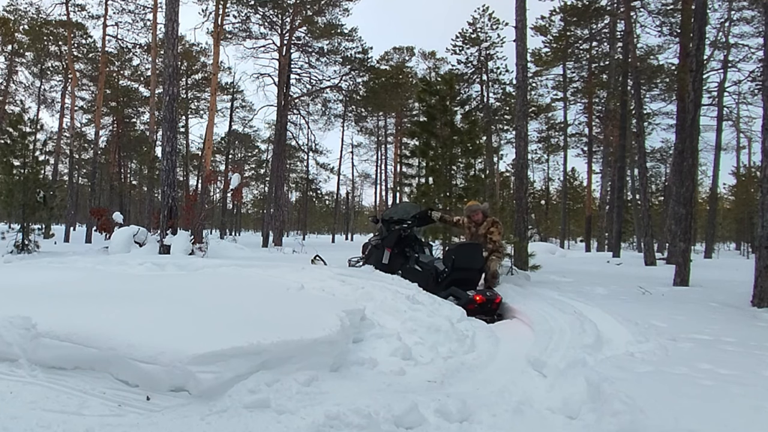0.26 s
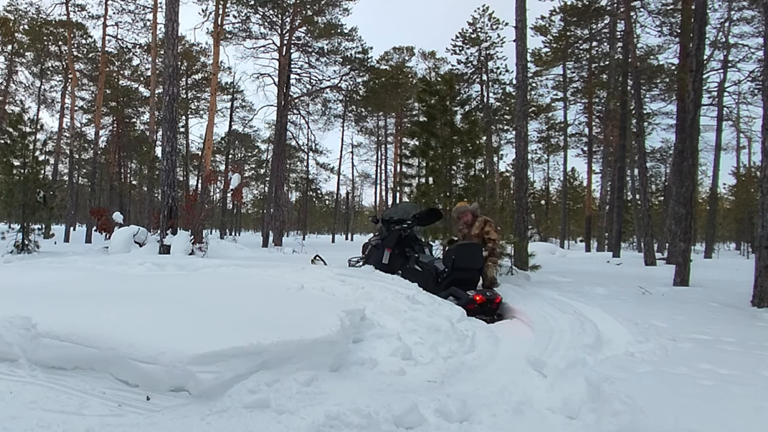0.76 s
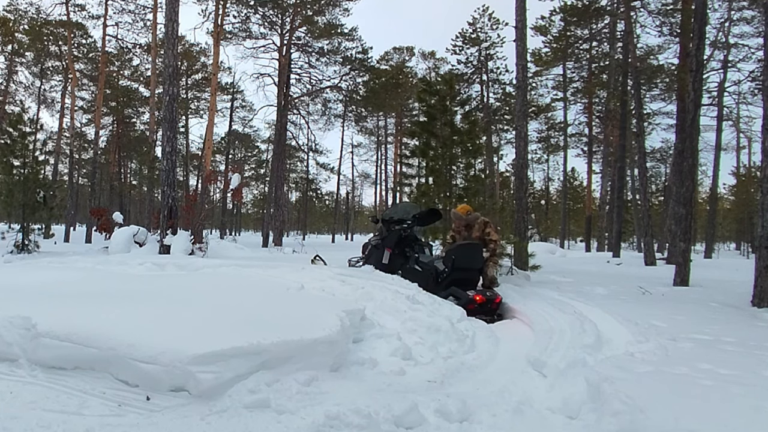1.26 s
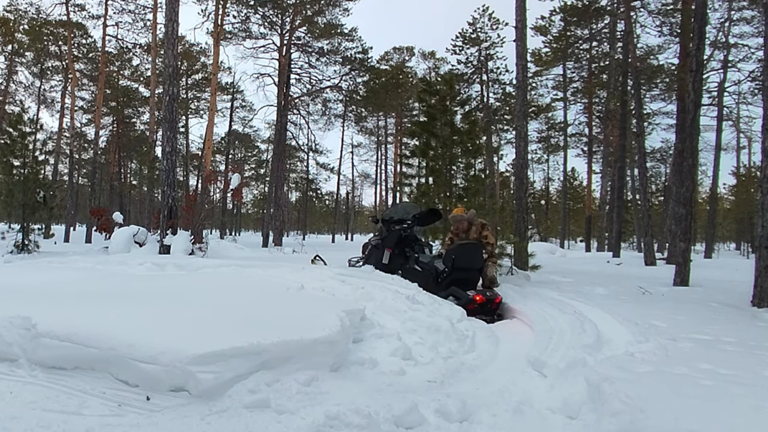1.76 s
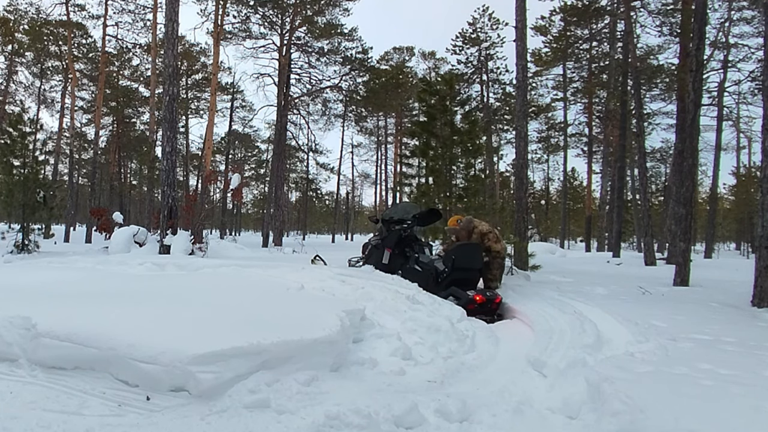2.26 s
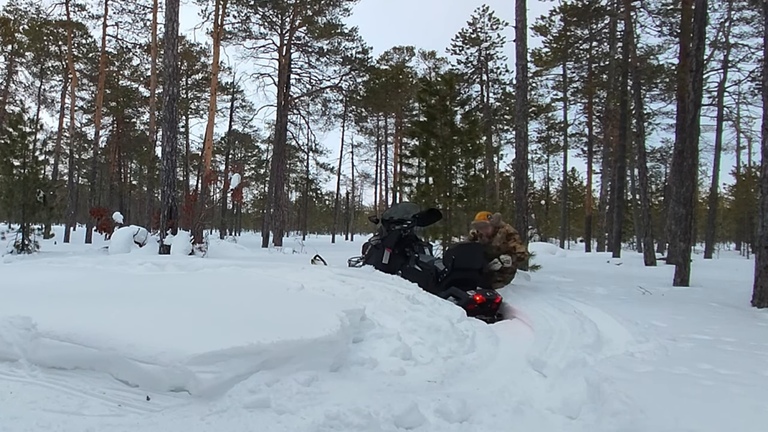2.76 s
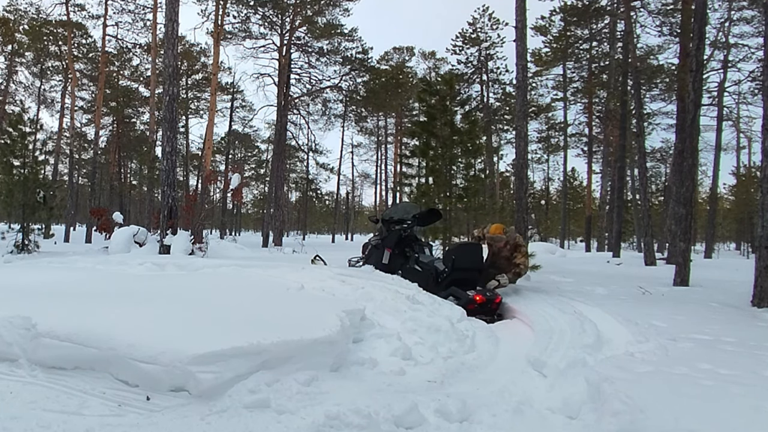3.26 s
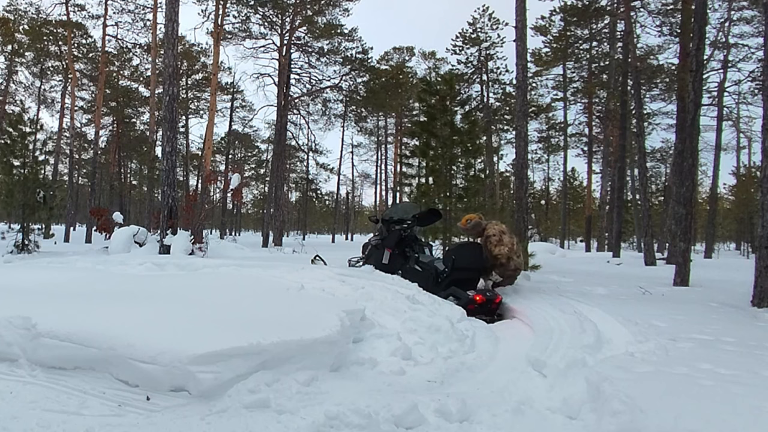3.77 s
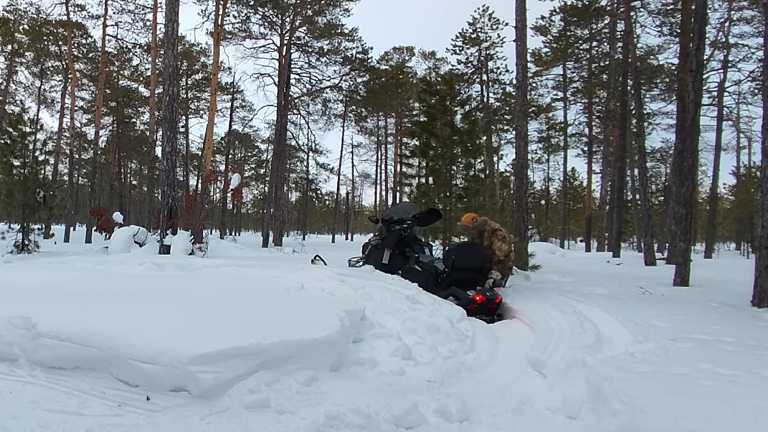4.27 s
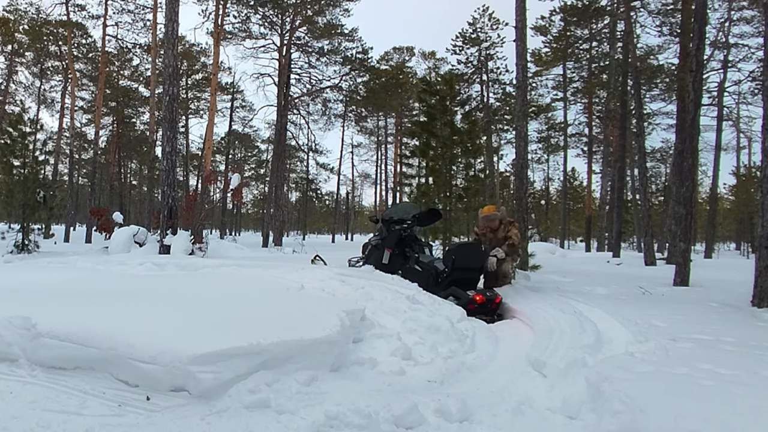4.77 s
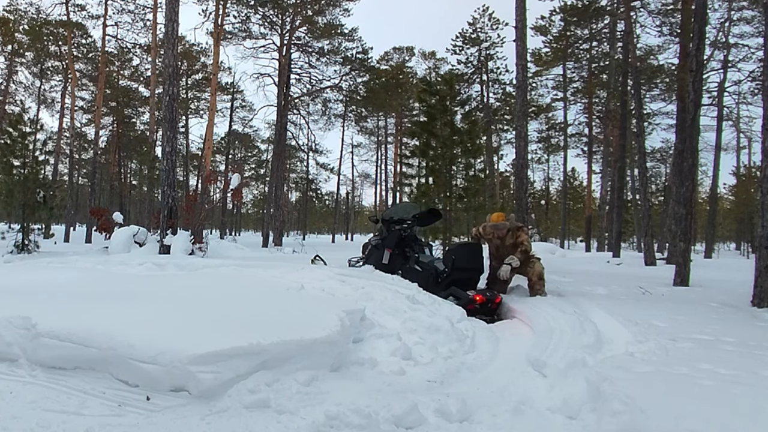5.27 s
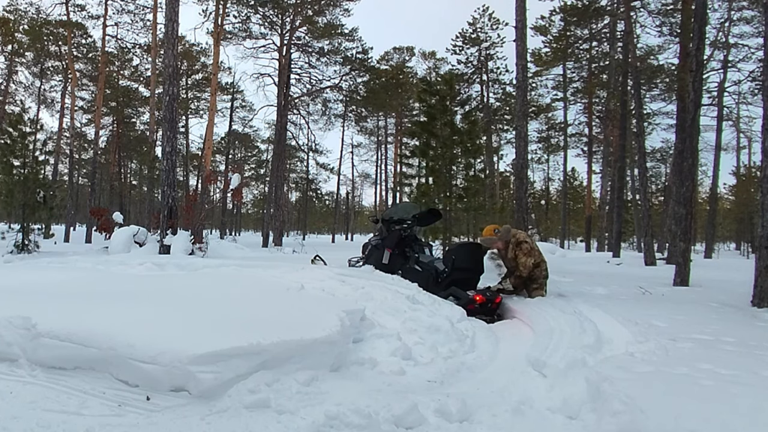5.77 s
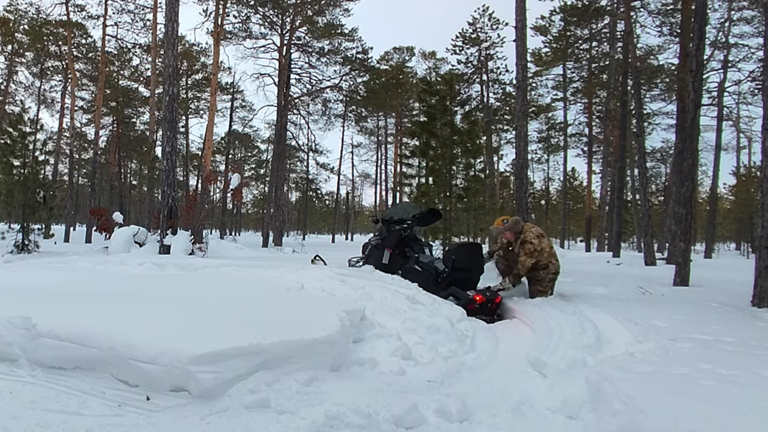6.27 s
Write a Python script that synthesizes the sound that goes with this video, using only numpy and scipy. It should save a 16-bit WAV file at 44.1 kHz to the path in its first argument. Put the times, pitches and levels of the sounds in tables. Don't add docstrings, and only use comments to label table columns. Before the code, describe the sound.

For about six and a half seconds a snowmobile idles some way off among snowy pines, never revving or stopping. Its exhaust beats low and fast, roughly twenty-seven thumps a second, each slightly different in strength and timing. A beat fails near 0.2 seconds, then around 1.9, 2.3, 3.0 and 3.2, with a soft late puff and a firmer catch afterward. Low rumble, plastic and metal clatter and steady airy fan and belt rush surround the thumps. Faint crisp clothing and snow rustles appear at 0.2-0.4, around 2 and 3, then more often from 4.6, strongest at 6.4. Dull gear knocks fall near 1.0 and 4.2, a tiny metallic jingle at 5.2 and a brighter knock at 5.6. The outdoor sound is fairly dry, with a brief muffled tree echo, narrow stereo leaning right and faint microphone hiss.

```python
import sys
import numpy as np
from scipy import signal
from scipy.fft import rfft, irfft, next_fast_len
from scipy.io import wavfile
from scipy.ndimage import uniform_filter1d

SR = 44100
rng = np.random.default_rng(int(sys.argv[2]) if len(sys.argv) > 2 else 0)


def output_pcm(signal):
    pcm = np.clip(np.atleast_2d(signal).T, -1, 1) * 32767
    wavfile.write(sys.argv[1], SR, np.round(pcm).astype(np.int16))


def rack_gain(trim_db):
    fader = np.asarray(trim_db, float)
    return 10 ** (fader / 20)


N = 287091

# time [s], level of the charge puffing late into the chamber [dB],
# time [s] and level [dB] of the firing that catches again, level left in the pipe at the misfire [dB].
MISFIRES = [
    (0.1788, -13, .2188, .7, -9),
    (1.858, -7, 1.8946, 2.6, -9),
    (2.306, -17, 2.3426, 2.5, -9),
    (2.9697, -11.5, 3.0101, .5, -9),
    (3.192, -3, 3.2317, 0, -12),
]


def at_hz(points, hz):
    point_hz, point_db = np.array(points).T
    return np.interp(np.log(hz + 1), np.log(point_hz), point_db, -90, -90)


def rms_one(x):
    return x / np.sqrt(np.mean(x ** 2) + 1e-20)


def coloured(x, spectrum):
    size = next_fast_len(N)
    gain = rack_gain(at_hz(spectrum, np.fft.rfftfreq(size, 1 / SR)))
    return rms_one(irfft(rfft(x, size) * gain, size)[..., :N])


def noise():
    return rng.standard_normal((2, N))


def drift(rate_hz):
    return coloured(rng.standard_normal(N), [(1, 0), (rate_hz, 0), (8 * rate_hz, -36)])


def clicks(times, sizes):
    out = np.full(N + SR // 5, 1e-18)
    places = np.round(np.asarray(times) * SR).astype(int) + SR // 10
    np.add.at(out, places, sizes)
    return out


def cut(x):
    return x[SR // 10:SR // 10 + N]


def ring(x, hz, t60):
    r, w = rack_gain(-60 / (t60 * SR)), 2 * np.pi * hz / SR
    return signal.lfilter([0, np.sin(w)], [1, -2 * r * np.cos(w), r * r], x)


def swelling(x, r):
    return signal.lfilter([1], [1, -2 * r, r * r], x)


def rumble():
    # frequency in Hz, level in dB per Hz.
    low_spectrum = [(15, -17), (25, -2), (45, -2.5), (100, -6.5), (180, 3), (215, -16.5), (300, -8),
                    (400, -27.5)]
    return rack_gain(-51.5) * coloured(noise(), low_spectrum)


def rustle(fidget_db, grains_per_s, spread_db):
    # time in seconds, peak level in dB, fading time in seconds.
    moves = [(0.18, -78, 0.12), (0.37, -76.5, 0.19), (1.75, -79.5, 0.055), (2.0, -77.5, 0.057),
             (2.24, -80.5, .05), (2.89, -82.5, 0.076), (3.049, -83, 0.029), (3.36, -78.5, 0.022),
             (3.84, -81, 0.11), (4.62, -74, 0.047), (5.05, -76.5, 0.1), (5.23, -75.5, 0.086),
             (5.55, -77, 0.042), (5.63, -75.5, .25), (6.26, -76.5, .08), (6.4, -68.5, 0.033),
             (6.5, -71, .05)]
    # frequency in Hz, level in dB per Hz.
    cloth = [(1500, -27.5), (3000, 7), (6000, -5), (9000, -5.5), (12000, -12), (15000, 0), (16500, -4.5)]
    t = np.arange(N) / SR
    level = rack_gain(-81.5 + fidget_db * drift(6.5))
    for s, db, fade in moves:
        slope_s = np.where(t < s, .6 * fade, fade)
        level = np.hypot(level, rack_gain(db) * np.exp(-abs(t - s) / slope_s))
    grains = rng.random((2, N)) < grains_per_s / SR
    grains = grains * rack_gain(spread_db * np.minimum(rng.exponential(1, (2, N)), 3))
    return level * coloured(grains * rng.choice([-1, 1], (2, N)), cloth)


def touches(blows, t60, gain_db):
    return sum(cut(ring(clicks([s], rack_gain(db + gain_db)), hz, t60)) for s, db, hz in blows)


def gear():
    # time in seconds, peak level in dB, pitch in Hz.
    knocks = [
        (0.981, -43, 520),
        (4.202, -45, 523),
        (5.627, -43, 1190),
    ]
    # time in seconds, peak level in dB, pitch in Hz.
    jingles = [
        (5.227, -58, 10300),
        (5.230, -62, 8000),
        (5.2669, -52, 10260),
        (5.268, -65, 7900),
    ]
    return touches(knocks, t60=0.03, gain_db=-1.5) + touches(jingles, t60=0.04, gain_db=-2.0)


def fan_rush(swell):
    # frequency in Hz, level in dB per Hz.
    air_spectrum = [(210, -29.5), (350, -11), (423, -9), (1010, -7), (1110, -15), (1340, -9), (1460, -14.5),
                    (1720, -11), (3250, -14.5), (4500, -21.5), (5160, -18.5), (9000, -33.5), (11700, -68.5),
                    (19800, -120)]
    return rack_gain(-62 + 0.2 * drift(13)) * (1 + 0.42 * swell) * coloured(noise(), air_spectrum)


def bustle(times, strength_db):
    # time after the firing in seconds, level in dB, length in seconds.
    bursts = [
        (-.011, 0.5, .006),
        (0.013, -0.27, .004),
    ]
    out = 0
    for offset, level_db, length in bursts:
        r = np.exp(-1 / (length * SR))
        blows = clicks(times + offset, rack_gain(level_db + 0.25 * strength_db))
        out = out + cut((1 - r) * np.e * swelling(blows, r))
    return out


def clatter(density, taps_per_s, spread_db):
    # panel pitch in Hz, level in dB, ringing time t60 in seconds.
    panels = [(378, -13, 0.082), (510, -7, 0.035), (660, -9, 0.023), (835, -5.5, 0.031),
              (998.6, -10.5, 0.34), (1036, -9, 0.062), (1188, -10, 0.029), (1338, -7.5, 0.028),
              (1596, -6, 0.027), (1727, -4.5, 0.017), (3924, -11, 0.009), (5030, -15.5, 0.004),
              (7310, -24, 0.015)]
    taps = rng.random((2, N)) < taps_per_s * density / SR
    taps = taps * rack_gain(spread_db * np.minimum(rng.exponential(1, (2, N)), 4))
    taps = taps * rng.choice([-1, 1], (2, N))
    dealt = rng.integers(0, 3, (2, N))
    out = 0
    for k, (hz, db, t60) in enumerate(panels):
        reaching = taps * (dealt == k % 3) + 1e-18
        out = out + rack_gain(db) * rms_one(ring(reaching, hz, t60))
    return rms_one(out)


def firings(slow_db_per_ms, scatter_db):
    # time in seconds, firings so far.
    crank = [(-0.047, 0), (0.0313, 2), (0.0711, 3), (0.9361, 26), (1.6042, 44), (2.1187, 58), (2.198, 60),
             (2.2346, 61), (2.6761, 73), (2.8208, 77), (3.0503, 83), (4.0463, 110), (4.1224, 112),
             (4.3687, 119), (5.0882, 139), (5.6751, 155), (6.0007, 164), (6.4915, 178)]
    # time in seconds, level in dB.
    at_start = (-.0087, 2.5)
    # time in seconds, level in dB against an ordinary firing.
    uneven = [(0.5228, -2.4), (0.596, -2.8), (0.7481, -2.7), (1.0126, 1.7), (1.1598, -2.2), (1.2374, 2.3),
              (1.3098, -1.2), (1.5296, -4.2), (1.5682, 2.5), (1.8207, 2.2), (2.1586, 2.9), (2.4167, -2.7),
              (2.4549, 2.2), (2.5624, -1.3), (2.783, -2.9), (3.3772, -4.3), (3.4547, 2.3), (3.7165, 1.8),
              (3.7923, 2.0), (3.8665, -1.7), (4.0839, -1.8), (4.1585, -1.2), (4.2619, 1.6), (4.942, -2.9),
              (5.1248, -1.7), (5.1617, -2.5), (5.2701, -1.9), (5.378, -1.9), (5.6367, -2.4), (6.3518, -3.6)]
    make_up = (-0.095, -.22, 0, -0.16)
    s, count = np.transpose(crank)
    turn = np.arange(count[-1] + 1)
    missed = [(row[0], row[4]) for row in MISFIRES]
    caught = [row[2:4] for row in MISFIRES]
    when, level_db = np.transpose([at_start] + uneven + missed + caught)
    which = np.round(np.interp(when, s, count)).astype(int)
    excess_db = np.bincount(which, np.maximum(level_db, -5), len(turn))

    turn_change = np.convolve(excess_db, [.22, .22, -.55, -.55])[1:len(turn) + 1]
    surge = np.cumsum(turn_change) / 1000
    known, first = np.unique(np.r_[which, count.astype(int)], return_index=True)
    times = surge + np.interp(turn, known, np.r_[when, s][first] - surge[known])

    gaps_ms = 1000 * np.diff(times, prepend=2 * times[0] - times[1])
    pipe_db = slow_db_per_ms * (gaps_ms - gaps_ms.mean())
    pipe_db = pipe_db + scatter_db * rng.standard_normal(len(times))
    pipe_db = pipe_db + np.convolve(excess_db, make_up[::-1])[1:len(turn) + 1]
    pipe_db[which] = level_db
    pumping_db = -6
    return times, pipe_db, np.maximum(.9 * pipe_db, pumping_db)


def back_pressure(times, pipe_db, wander_s):
    # shell pitch in Hz, level in dB, ringing time t60 in seconds, delay after the firing in seconds.
    shell = [(270, -67.5, 0.033, -.004), (294.3, -62, 0.074, .003), (331, -65.5, 0.066, 0.019)]
    luck = rng.standard_normal((len(times), 2))
    out = 0
    for hz, db, t60, delay_s in shell:
        sizes = rack_gain(db + .6 * pipe_db + 1.3 * luck[:, 1])
        blows = clicks(times + delay_s + wander_s * luck[:, 0], sizes)
        out = out + ring(ring(blows, hz, t60), hz, t60) * hz / SR
    return cut(out)


def exhaust(times, pipe_db, chamber_db, mode_scatter_db):
    # pitch in Hz, level in dB, ringing time t60 in seconds, polarity.
    chamber = [(23.2, -45, 0.3, -0.7), (37.3, -50, 0.46, -0.47), (67.1, -33, 0.33, 0.95),
               (85.4, -29.5, 0.047, 0.97)]
    # pitch in Hz, level in dB, ringing time t60 in seconds,
    # polarity.
    pipe = [(117.1, -51.4, 0.218, -1), (152.2, -24.5, 0.03, 1), (178.6, -28.7, 0.127, -1),
            (188.6, -45.8, 0.3, -1), (215.2, -45.4, 0.124, -1), (241.6, -52.2, 0.144, -1),
            (288.7, -34.1, 0.044, 1), (293.2, -31.2, 0.03, -1), (342.2, -51.7, 0.061, 1),
            (181.9, -46.5, 0.25, -0.58)]
    missed_s, late_db = np.transpose(MISFIRES)[:2]
    chamber_s = np.r_[times, missed_s + .0103]
    chamber_part = (chamber, chamber_s, np.r_[chamber_db, late_db])
    pipe_part = (pipe, times, pipe_db)
    out = 0
    for modes, when, level_db in (chamber_part, pipe_part):
        for hz, db, t60, sign in modes:
            scatter = mode_scatter_db * rng.standard_normal(len(when))
            blows = clicks(when - .006, sign * rack_gain(db + level_db + scatter))
            out = out + ring(blows, hz, t60)
    r = np.exp(-2 * np.pi * 2360 / SR)
    out = (1 - r) ** 2 * swelling(out, r)
    return cut(signal.lfilter(*signal.butter(1, 90, "high", fs=SR), out))


def ports(direct, scattered):
    # frequency in Hz, likeness of left and right from 0 to 1.
    likeness = [(30, 0.94), (100, 1), (250, 0.99), (600, 0.93), (1200, 0.94), (2500, 0.66), (5000, 0.73),
                (7500, 0.23), (12000, 0.1)]
    size = next_fast_len(N)
    point_hz, point_alike = np.array(likeness).T
    hz = np.fft.rfftfreq(size, 1 / SR)
    alike = np.clip(np.interp(np.log(hz + 1), np.log(point_hz), point_alike), 0, 1)
    mid = irfft(rfft(direct, size) * np.sqrt((1 + alike) / 2), size)[:N]
    side = irfft(rfft(scattered, size) * np.sqrt((1 - alike) / 2), size)[:N]
    lag = 7
    return np.array([np.pad(mid + side, (lag, 0), "edge")[:N], mid - side])


def scene():
    times, pipe_db, chamber_db = firings(slow_db_per_ms=0.27, scatter_db=0.48)
    swell = bustle(times, pipe_db)
    engine = rumble() + fan_rush(swell)
    engine = engine + rack_gain(-59) * clatter(.25 + swell, taps_per_s=1600, spread_db=4.0)
    man = rack_gain(9.0) * rustle(fidget_db=0.6, grains_per_s=8400, spread_db=1.5)

    thumps = rack_gain(-0.21) * exhaust(times, pipe_db, chamber_db, mode_scatter_db=0.5)
    thumps = thumps + back_pressure(times, pipe_db, wander_s=0.0009)
    dull = signal.butter(4, 240, fs=SR, output="sos")
    echo = rack_gain(-7) * signal.sosfilt(dull, np.roll(thumps, SR // 40))

    direct = thumps + gear() + engine[0] + man[0]
    scattered = echo + engine[1] + man[1]
    return ports(direct, scattered) * rack_gain([[-.15], [.15]])


def microphone_hiss():
    # frequency in Hz, level in dB per Hz.
    hiss_spectrum = [(4120, -25.5), (7000, -14), (9890, -14.5), (11900, -8), (14900, -3), (15600, -4),
                     (16000, -14)]
    return rack_gain(-75.5) * coloured(noise(), hiss_spectrum)


def mottled_highs(x, from_hz, share, depth_db):
    mid_side = np.array([x[0] + x[1], x[0] - x[1]]) / 2
    hz, _, bins = signal.stft(mid_side, SR, nperseg=2048)
    hz = hz[:, None]
    patch = uniform_filter1d(uniform_filter1d(abs(bins), size=5, axis=1), size=2, axis=2)
    limit = share + .1 * (hz > 3 * from_hz)
    faint = patch < limit * np.median(patch, axis=2, keepdims=True)
    bins = bins * np.where(faint & (hz > from_hz), rack_gain(depth_db), 1)
    mid, side = signal.istft(bins, SR, nperseg=2048)[1][:, :N]
    return np.array([mid + side, mid - side])


def low_pass(x):
    return signal.sosfilt(signal.butter(12, 16390, fs=SR, output="sos"), x)


def record(dry):
    patchy = mottled_highs(dry + microphone_hiss(), from_hz=2400, share=.84, depth_db=-25)
    dipped = patchy - .6 * signal.lfilter(*signal.iirpeak(8720, 35, SR), patchy)
    top_cut = signal.ellip(10, .2, 40, 15480, fs=SR, output="sos")
    return low_pass(signal.sosfiltfilt(top_cut, dipped))


dry = scene()
out = record(dry)
output_pcm(out)
```